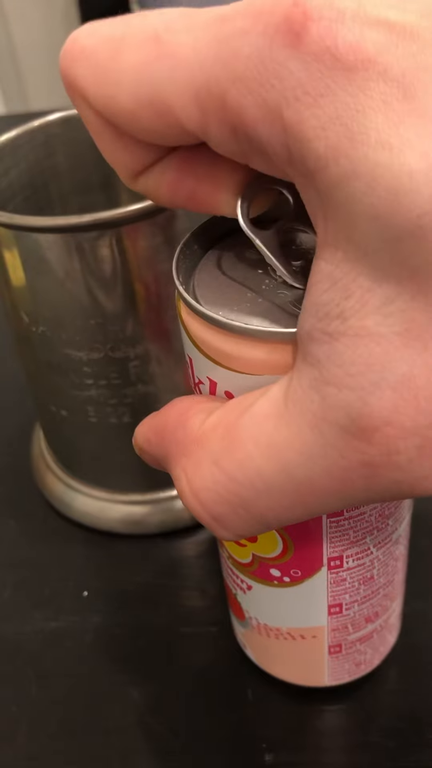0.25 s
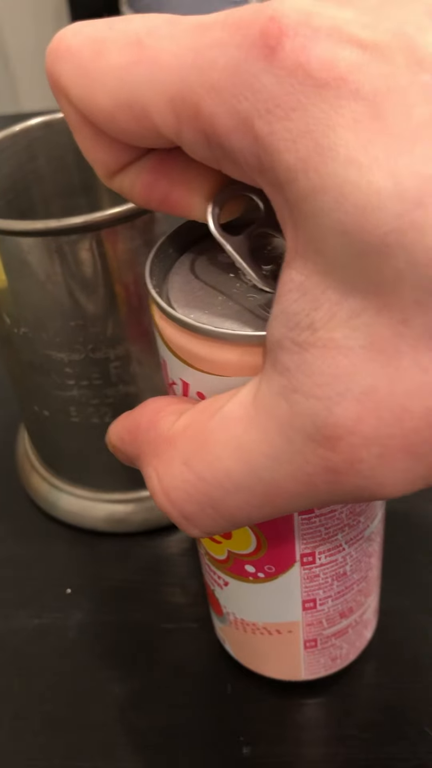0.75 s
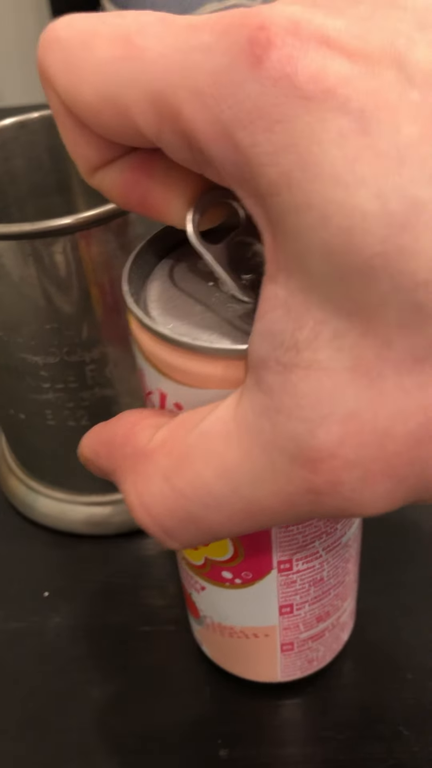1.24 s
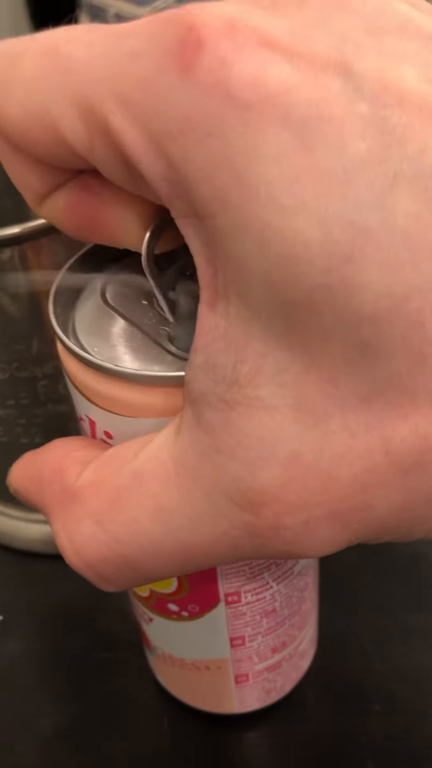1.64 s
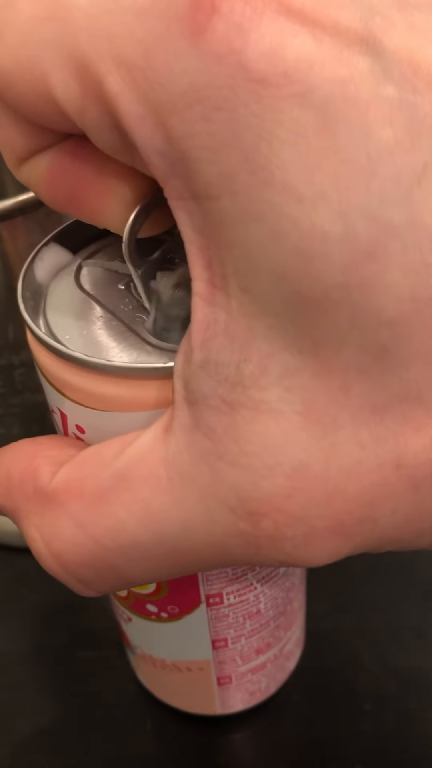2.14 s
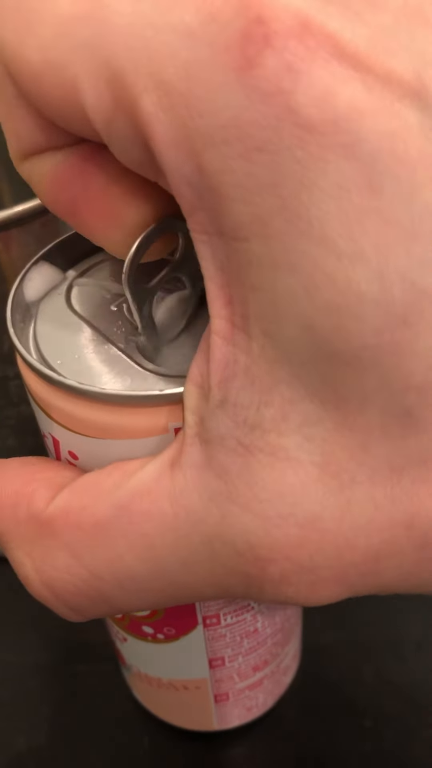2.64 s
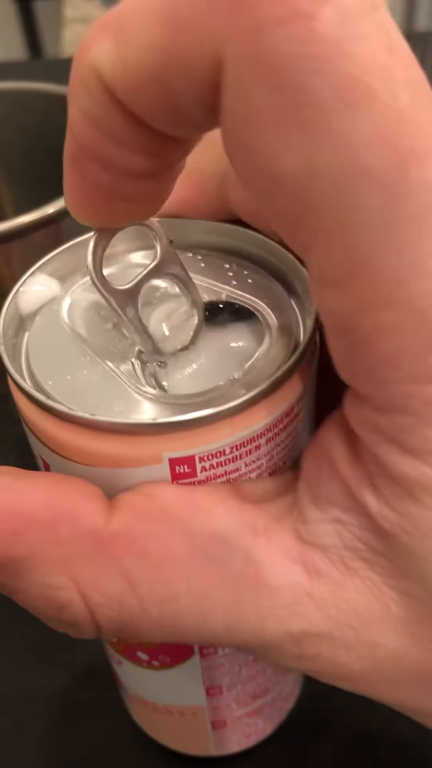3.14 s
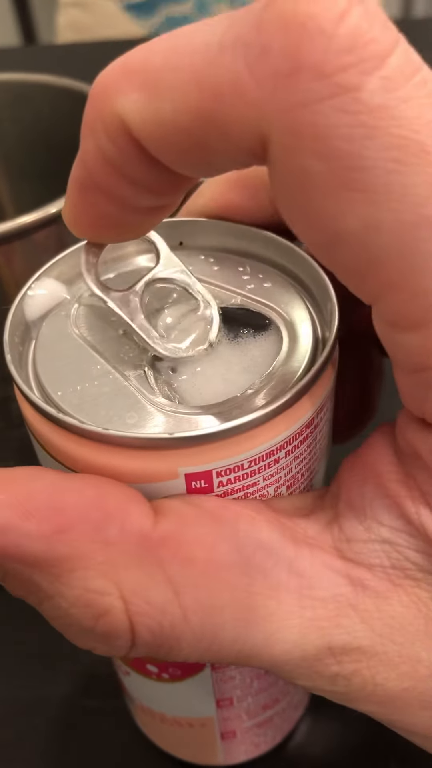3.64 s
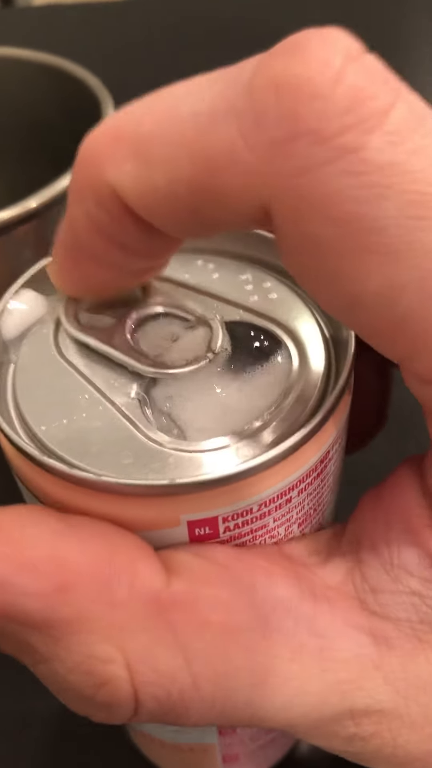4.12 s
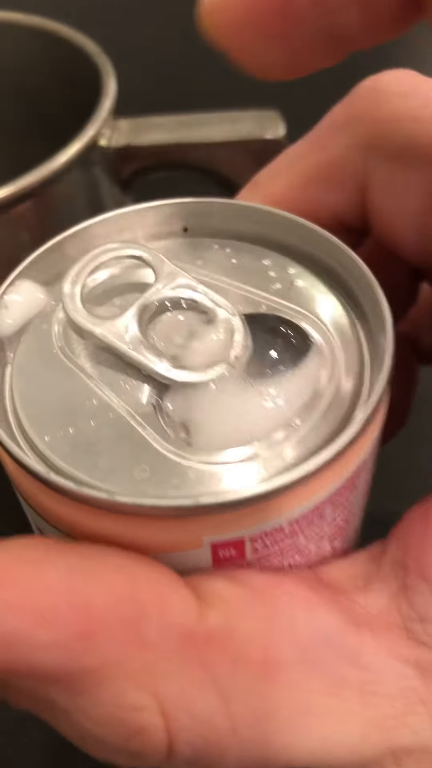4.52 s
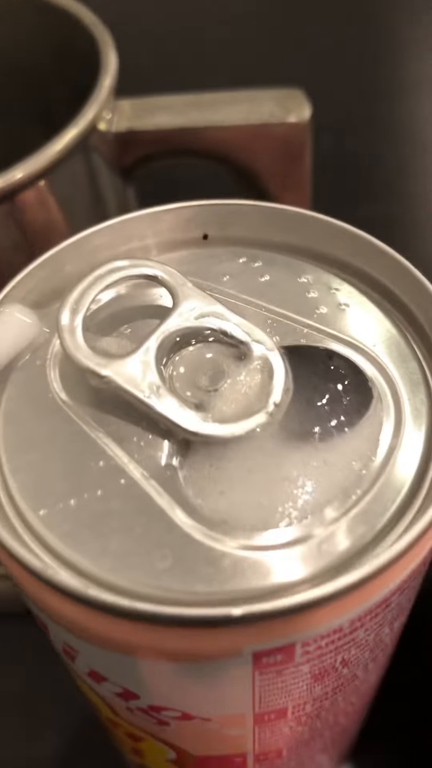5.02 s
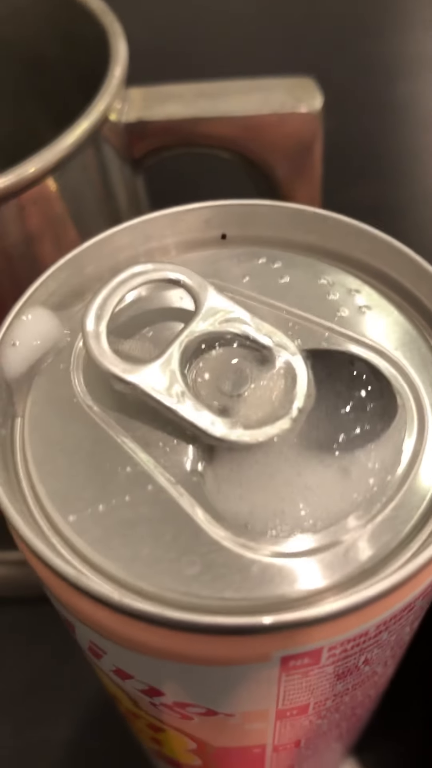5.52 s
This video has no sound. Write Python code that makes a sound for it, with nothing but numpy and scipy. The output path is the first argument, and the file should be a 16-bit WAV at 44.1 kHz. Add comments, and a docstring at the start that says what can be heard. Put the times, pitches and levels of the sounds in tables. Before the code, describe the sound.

A sealed drink can gives a sharp crack and split-second bright hiss, with more snaps just after. About one and a half seconds in, small creaks lead to a huge dry pop with a low thump. Then delicate foam crackle, faint metal ticks, a short panel plunk and soft knocks further off, over low room hum.

```python
"""A ring-pull is levered up on a full drink can in a small hard room: the scored lid cracks in steps as noise bursts
in broad resonances, gas vents as bright hiss, and the flap tears with a loud pop that turns the recorder's gain down.
Foam fizzes as random bubble rings, then the microphone moves over the hole; the folded tab and lid panel ring as sines.
Fingers rustle and a thin ring sounds as filtered noise. Further off are dull modal knocks and a grainy shuffle,
over coloured air noise and a low wavering hum."""
import sys
import numpy as np
from scipy import signal
from scipy.fft import rfft, irfft
from scipy.io import wavfile
from scipy.ndimage import uniform_filter1d, minimum_filter1d

SR = 44100
rng = np.random.default_rng(int(sys.argv[2]) if len(sys.argv) > 2 else 0)


def master(y):
    """Save y as 16-bit WAV."""
    cut = np.clip(np.atleast_2d(y).T, -1, 1)
    pcm = np.round(cut * 32767)  # scale
    wavfile.write(sys.argv[1], SR, pcm.astype(np.int16))


N = 254456
T = np.arange(N) / SR

# Lid resonances, nearly sealed and then with the flap bent; each width belongs to one of two filter passes:
# (sealed frequency [Hz], width [Hz], level [dB], bent frequency [Hz], width [Hz], level [dB])
LID_MODES = [(1270, 1100, -22.5, 1200, 700, -6), (2004, 770, -1.5, 2320, 800, -2),
             (3170, 1100, -13.5, 3350, 1200, -1.5), (4660, 1100, -2, 5100, 1500, -2),
             (6200, 1300, -5.5, 6900, 2000, 0.5), (8600, 2100, -9, 8500, 1500, -6),
             (11320, 3000, -6, 10500, 2400, -3.5), (14900, 2400, -5.5, 15000, 3500, -4)]
# Cracks and ticks of lid and tab, level before the mode gains, brightness about 5 kHz:
# (time [s], level [dB], brightness [dB/octave], resonance nearest the break [Hz], noise decay [ms], room share [dB])
CRACKS = [ (.0073, -5, -2.5, 4674, 1.04, -5.5), (0.168, -7, 4.5, 5490, 1.25, -15),
          (0.174, -19.5, 1, 4770, 1.1, -10), (.1780, -10, 2, 3153, 3, -7.5),
          (0.1841, -17.5, -0.5, 3049, 3.3, -0.5), (0.199, -21, 4, 8600, 6.2, -6),
          (1.5302, -48.5, 3, 8000, 2.4, -18.5), (1.555, -49, 2, 8058, 1.4, -12.5),
          (1.5924, -37, .3, 4885, 2.7, -8), (1.5938, -30.5, -1.5, 3296, 3.1, -3),
          (1.6034, -26, 1, 7500, 1.6, -1.5), (1.616, 2.5, 1.5, 7000, .6, -15),
          (1.6173, 10, 2, 3000, 1.8, -9.5), (2.5590, -56, -1.5, 14000, 1.86, -14.5),
          (2.8420, -59, 6, 8560, 2.15, -13), (3.9854, -56.5, -1, 10410, 0.86, -17),
          (4.055, -65, 2, 6690, 1.1, -18.5), (4.068, -65, 6, 6720, .8, -15),
          (4.0958, -48, 4, 5000, 1.17, -14), (4.2996, -57, 0, 7000, 1.25, -17),
          (4.599, -41, -4, 1670, 5.3, -6.5), (4.889, -62.5, 2, 3600, 4.9, -6),
          (4.915, -60.5, 7, 8500, 1.5, -17), (5.4350, -60.5, -2.8, 14000, 1.1, -14)]
FLAP_BENDS_S = 1
NEAREST_DB, NEAREST_OCTAVES = 6, .3  # boost of the resonance nearest the break, its reach

# Gas through the first slit
VENT_DB, VENT_HOLD_S, VENT_FALL_DB_PER_S = -19, .007, 1896
# Pressure pushes: (time [s], peak [dB], frequency [Hz], decay before the soft onset [ms])
PUFFS = [(.004, -35.5, 92.36, 16.4), (.007, -35, 627, 1.8), (.177, -37.5, 800, 3.1), (0.189, -35, 120, 20),
         (1.603, -33.5, 242.4, 6.3), (1.614, -9.5, 199, 10), (1.626, -8, 65, 13), (2.846, -58, 430, 8.2),
         (2.849, -48.5, 106, 32)]
# Lid panel popping flat: (time [s], level [dB], frequency [Hz], swell [ms], room share [dB])
DENT = (4.3008, -28, 669.5, 6.5, -30)
# Overtones of the snapping panel: (frequency [Hz], level [dB], t60 [s])
DENT_OVERTONES = [(2590, -34, .011), (2870, -36, .011), (7150, -40, 0.0075)]
# Modes of the strained tab: (frequency [Hz], relative level [dB], t60 [s])
TAB_MODES = [(3850, -1, .017), (5250, -2.5, .017)]
# The tab slipping on its rivet: (time [s], level before the mode levels [dB])
TAB_SLIPS = [(1.531, -47.5), (1.557, -49)]

# Foam, silent before the first row: (time [s], level [dB])
FOAM_LEVEL = [(2.2, -86.5), (2.5, -75.5), (2.84, -67.5), (2.95, -72.5), (3.6, -79), (4.1, -78.5),
              (4.58, -76), (4.7, -70), (5.77, -73.5)]
# Air over the drink, colouring the foam: (frequency [Hz], width [Hz], relative level [dB])
HEADSPACE = [(5767, 2600, -9.5), (8500, 1100, -0.5)]
BUBBLE_SPREAD_DB = 3  # scale of the random bubble strengths
LOOK_IN_S = (4.74, 5.1)  # the microphone moves over the hole
BUBBLE_HZ, HEADSPACE_DB = (7250, 4696), (-3.5, -17)  # loudest bubble pitch, headspace colour: (before, after)

# Fingers shifting on the can: (full level from [s], hold [s], low rasp [dB], airy hiss [dB])
RUSTLE = [(2.56, .04, -69.5, -79), (2.81, .04, -68.5, -77), (4.72, 0.12, -73, -71), (4.9, 0.045, -73, -75)]
RUSTLE_DB_PER_S = (799.5, 700.5)  # (rise, fall)
# Partials of a faint thin ring, width per filter pass: (frequency [Hz], width [Hz], level [dB])
RING_PARTIALS = [(2430, 110, -1), (3040, 134, -7)]
# Its strokes, before the partial levels: (full level from [s], hold [s], level [dB])
RING_STROKES = [(4.75, 0.069, -66), (4.95, .015, -77)]
RING_DB_PER_S = (346, 220)  # (rise, fall)

# Modes of what is knocked: (frequency [Hz], relative level [dB], t60 [s])
KNOCKED_BODY = [(226, -4, 0.095), (460, -11, 0.029), (668, -11.5, 0.061), (771, 7.3, 0.018),
                (1084, 0, 0.025), (1468, -14.5, 0.043), (2620, -24, 0.0089)]
# Dull knocks further off, brightness about 790 Hz: (time [s], level before the mode levels [dB], brightness [dB/octave])
KNOCKS = [(2.7178, -36, 0), (2.8445, -50.5, -5), (3.7515, -32, 1.3), (4.0188, -35, 1), (4.6957, -25.5, 2.5),
          (5.2870, -59.5, -2), (5.4227, -54.5, -6), (5.6601, -59, -5)]
THUD_DB = -5.5  # thud sent round the room, relative to the knock level
# Slides over a surface: (full level from [s], hold [s], level [dB])
SHUFFLE = [(4.78, 0.033, -68), (5.11, 0.055, -64.5), (5.29, .14, -62.5), (5.645, 0.019, -67)]
SHUFFLE_DB_PER_S = (300, 350)  # (rise, fall)

# Room answer, levels relative: (frequency [Hz], t60 [s], level [dB])
ROOM_BANDS = [(99, 0.23, -6.5), (235, 0.47, -0.5), (580, 0.33, 15), (1480, .5, 0.5), (2500, 0.56, -0.5),
              (4200, 0.5, 1), (7000, .45, -2), (10200, 0.35, -4.5), (13000, 0.25, -1.5), (15430, .25, -6.5)]
WALL_MS, BUILD_MS = 12, 1  # first walls answer, then the field fills up
VENT_ROOM_DB, PUFF_ROOM_DB, PING_ROOM_DB = -1.5, -7, -15.5  # shares sent round the room
# Shape of the room air noise: (frequency [Hz], relative level [dB/Hz])
AIR_SPECTRUM = [(15, -37), (25, -16), (110, -3), (157, -6), (194, -9), (461, -19), (527, -18.5),
                (1090, -25.5), (1640, -31.5), (2460, -32.5), (2660, -37), (2890, -33.5), (5230, -39),
                (6490, -36), (15800, -52.5)]
AIR_DB = -62.5
# Wavering hum, width per filter pass: (frequency [Hz], width [Hz], level [dB])
HUM = [(51.3, 6.1, -75), (105, 39, -68.5), (190, 17, -66), (251, 42, -71.5), (1010, 100, -80.5),
       (5260, 300, -88.5)]

# Recorder: ceiling, own hiss, top cut
CEILING_DB, SELF_NOISE_DB, CUTOFF_HZ = -1.2, -82, 16600
FAST_DB_PER_S, FAST_SHARE_DB = 449, 4  # quick recovery of the first few dB
HOLD_S, RECOVER_S = 0.36, 0.89  # the rest is held, then shrinks with this time constant


def from_db(db):
    """Amplitude ratio of a level in dB."""
    return 10 ** (np.asarray(db) / 20)


def rms_one(x):
    """Scale to an RMS of one."""
    return x / np.sqrt(np.mean(x ** 2) + 1e-30)


def peak_one(x):
    """Scale to a peak of one."""
    return x / np.max(np.abs(x))


def at_hz(points, hz, column=1):
    """Read a table column along a logarithmic frequency axis."""
    points = np.array(points)
    return np.interp(np.log(hz), np.log(points[:, 0]), points[:, column])


def in_time(rows):
    """A level curve in dB; practically silent before its first row."""
    return np.interp(T, *np.transpose(rows), left=-140)


def resonate(x, hz, width_hz):
    """One damped resonance: a two-pole filter with zeros at both ends of the spectrum."""
    radius = np.exp(-np.pi * width_hz / SR)
    poles = [1, -2 * radius * np.cos(2 * np.pi * hz / SR), radius * radius]
    return signal.lfilter([1 - radius, 0, radius - 1], poles, x)


def resonate_twice(x, hz, width_hz):
    """Two equal resonances in a row, for steeper skirts."""
    return resonate(resonate(x, hz, width_hz), hz, width_hz)


def band(x, low_hz, high_hz):
    """Keep the band between two frequencies."""
    sos = signal.butter(2, [low_hz, min(high_hz, .45 * SR)], "band", fs=SR, output="sos")
    return signal.sosfilt(sos, x)


def add(out, s, sound):
    """Lay a sound into the track at a time in seconds."""
    i = round(s * SR)
    out[i:i + len(sound)] += sound[:N - i]


def strokes(rows, db_per_s, column=2):
    """Gain of separate strokes: each rises ahead of its start, holds for its length and falls."""
    rise, fall = db_per_s
    gain = np.zeros(N)
    for row in rows:
        start, length, level_db = row[0], row[1], row[column]
        before, after = np.maximum(start - T, 0), np.maximum(T - start - length, 0)
        gain += from_db(level_db - rise * before - fall * after)
    return gain


def struck(modes, db):
    """Freely ringing metal: a sum of dying sines."""
    t = T[:3000]
    return sum(from_db(db + mode_db - 60 * t / t60) * np.sin(2 * np.pi * hz * t) for hz, mode_db, t60 in modes)


def cracks():
    """Tearing metal: dying noise shakes the broad lid resonances; returns direct sound and room feed."""
    out, feed, t = np.zeros(N), np.zeros(N), T[:1800]
    for s, db, tilt_db, nearest_hz, ms, room_db in CRACKS:
        tear = rng.standard_normal((len(LID_MODES), len(t))) * np.exp(-t * 1000 / max(ms, .1))
        burst, power = np.zeros(len(t)), 0
        for k, modes in enumerate(LID_MODES):
            hz, width_hz, mode_db = modes[3:] if s > FLAP_BENDS_S else modes[:3]
            near_db = NEAREST_DB * np.exp(-(np.log2(hz / nearest_hz) / NEAREST_OCTAVES) ** 2)
            gain = from_db(db + mode_db + near_db + tilt_db * np.log2(hz / 5000))
            part = gain * peak_one(resonate_twice(tear[k], hz, width_hz))
            burst += part
            power += gain ** 2
            # summed over all directions the burst has the same energy but an even spectrum
            even = rms_one(resonate_twice(t == 0, hz, width_hz))
            add(feed, s, (-1) ** k * from_db(room_db) * np.std(part) * even)
        add(out, s, np.sqrt(power) * peak_one(burst))
    return out, feed


def vent():
    """Gas under pressure hisses brightly through the slit, as wideband noise that soon dies."""
    level_db = VENT_DB - VENT_FALL_DB_PER_S * np.maximum(T - VENT_HOLD_S, 0)
    return from_db(level_db) * rms_one(band(rng.standard_normal(N), 2200, 17000))


def puffs():
    """Released pressure thumps low and lumpy: a sine and band noise under one soft, dying envelope."""
    out, t = np.zeros(N), T[:12000]
    for s, db, hz, ms in PUFFS:
        lumps = rms_one(band(rng.standard_normal(len(t)), hz * 0.12, hz * 3.8))
        push = np.sin(2 * np.pi * hz * t) + 0.78 * lumps
        envelope = (1 - np.exp(-t / .006)) * np.exp(-t * 1000 / ms)
        add(out, s, from_db(db) * peak_one(push * envelope))
    return out


def dent():
    """The panel swings up over a few cycles and is stopped by the finger, leaving a weak dying tail."""
    s, db, hz, ms = DENT[:4]
    out, t = np.zeros(N), T[:3000]
    swell = np.sin(np.pi * np.minimum(t * 1000 / ms, 1)) ** 2
    tail = from_db(-10.5 - 60 * t / 0.074)
    add(out, s, from_db(db) * (swell + tail) * np.sin(2 * np.pi * hz * t))
    return out


def pings():
    """Each slip sets the tab ringing thinly; the panel's overtones flash as it pops."""
    out = np.zeros(N)
    for s, db in TAB_SLIPS:
        add(out, s, struck(TAB_MODES, db))
    add(out, DENT[0], struck(DENT_OVERTONES, 0))
    return out


def foam():
    """Tiny bubbles burst at random, a few much louder, each ringing some three cycles."""
    strength_db = BUBBLE_SPREAD_DB * (np.minimum(rng.exponential(1, N), 4.8) - 3.0)
    pulses = from_db(strength_db) * rng.choice([-1, 1], N)
    bursting = rng.random(N) < 1200 / SR  # about 1200 a second
    born = pulses * bursting + 0.077 * rng.standard_normal(N)
    pitch_class, loudest_hz = rng.integers(0, 12, N), np.interp(T, LOOK_IN_S, BUBBLE_HZ)
    rings = np.zeros(N)
    for k, hz in enumerate(np.geomspace(2200, 14500, 12)):
        weight = from_db(-6.0 * np.log2(hz / loudest_hz) ** 2)
        rings += weight * resonate(born * (pitch_class == k), hz, hz / 3.1)
    hollow = sum(from_db(db) * resonate(rings, hz, width_hz) for hz, width_hz, db in HEADSPACE)
    colour = from_db(np.interp(T, LOOK_IN_S, HEADSPACE_DB))
    # the hollow part is fed by rings 1.5 times weaker than the direct ones
    fizz = 1.5 * rings + colour * 1.5 * hollow / 1.5
    return from_db(in_time(FOAM_LEVEL)) * rms_one(fizz)


def rustle():
    """Skin rubs softly on metal: a low rasp and an airy hiss of noise."""
    rasp = rms_one(band(rng.standard_normal(N), 1800, 4450))
    airy = rms_one(band(rng.standard_normal(N), 5000, 15800))
    rasp_gain = strokes(RUSTLE, RUSTLE_DB_PER_S)
    airy_gain = strokes(RUSTLE, RUSTLE_DB_PER_S, column=3)
    return rasp_gain * rasp + airy_gain * airy


def thin_ring():
    """A faint ring made of noise in two narrow resonances."""
    partials = [from_db(db) * rms_one(resonate_twice(rng.standard_normal(N), hz, width_hz))
                for hz, width_hz, db in RING_PARTIALS]
    return strokes(RING_STROKES, RING_DB_PER_S) * sum(partials)


def knocks():
    """A soft contact starts every mode of the body at once; a broad thud goes round the room."""
    out, feed, t = np.zeros(N), np.zeros(N), T[:8000]
    thud = peak_one(band(band(t == 0, 147, 1560), 130, 2140))
    for s, db, tilt_db in KNOCKS:
        for hz, mode_db, t60 in KNOCKED_BODY:
            level_db = db + mode_db + tilt_db * np.log2(hz / 790)
            soft_start = 1 - np.exp(-t * hz * 0.71)
            add(out, s, from_db(level_db - 60 * t / t60) * soft_start * np.sin(2 * np.pi * hz * t))
        add(feed, s, from_db(db + THUD_DB) * thud)
    return out, feed


def shuffle():
    """Something slides over a surface: uneven dull grains of noise."""
    unevenness_db = 4.3 * rms_one(band(rng.standard_normal(N), 9.3, 115))
    grains = rng.standard_normal(N) * from_db(unevenness_db)
    return strokes(SHUFFLE, SHUFFLE_DB_PER_S) * rms_one(band(grains, 310, 1160))


def room(x, wall_ms, build_ms):
    """Dense echoes: noise that builds up after the first wall and dies band by band; energy 1."""
    t, edges = T[:SR], 70 * 2 ** np.arange(0, 7.9, .25)
    tail = np.zeros(SR)
    for low in edges[:-1]:
        hz = low * 2 ** (1 / 8)
        level_db = at_hz(ROOM_BANDS, hz, column=2) - 60 * t / at_hz(ROOM_BANDS, hz)
        tail += band(rng.standard_normal(SR), low, low * 2 ** (1 / 4)) * from_db(level_db)
    tail *= 1 - np.exp(-np.maximum(t * 1000 - wall_ms, 0) / build_ms)
    return signal.fftconvolve(x, tail / np.sqrt(np.sum(tail ** 2)))[:N]


def room_tone():
    """Steady coloured air noise with a few narrow wavering hums, each resonated from noise."""
    hz = np.maximum(np.fft.rfftfreq(N, 1 / SR), 1)
    spectrum = rfft(rng.standard_normal(N)) * from_db(at_hz(AIR_SPECTRUM, hz))
    air = from_db(AIR_DB) * rms_one(irfft(spectrum, N))
    hums = [from_db(db) * rms_one(resonate_twice(rng.standard_normal(N), hum_hz, width_hz))
            for hum_hz, width_hz, db in HUM]
    return air + sum(hums)


def scene():
    """The can close to the microphone, its room answer, the sounds further off and the room tone."""
    lid, lid_feed = cracks()
    gas, push, pop, thin = vent(), puffs(), dent(), pings()
    far, thuds = knocks()
    feed = lid_feed + from_db(VENT_ROOM_DB) * gas + from_db(PUFF_ROOM_DB) * push
    feed += from_db(DENT[4]) * pop + from_db(PING_ROOM_DB) * thin
    wet = room(feed, WALL_MS, BUILD_MS) + room(thuds, 0.63, 0.78)
    can = lid + gas + push + pop + thin + foam() + rustle() + thin_ring()
    return (can + far + shuffle() + wet + room_tone())[None]


def released(level, fall_per_s):
    """Jumps up with the demand, sinks at a set pace."""
    return np.maximum.accumulate(level + fall_per_s * T) - fall_per_s * T


def record(dry):
    """A limiter ducks just ahead of an overload, gives a little back at once, holds the rest and creeps up; hiss, top cut."""
    over_db = np.maximum(20 * np.log10(np.abs(dry[0]) + 1e-9) - CEILING_DB, 0)
    # a straight fall of the logarithm makes the cut in dB shrink exponentially
    slow_db = np.exp(released(np.log(np.maximum(over_db - FAST_SHARE_DB, 1e-6)), 1 / RECOVER_S))
    hold = round(HOLD_S * SR)
    # largest cut within the hold time
    held_db = -minimum_filter1d(np.pad(-slow_db, (hold, 0)), hold + 1, origin=hold // 2)[hold:]
    duck_db = np.maximum(held_db, released(over_db, FAST_DB_PER_S))
    ahead_db = uniform_filter1d(np.pad(duck_db[30:], (0, 30), "edge"), size=40)
    ceiling = from_db(CEILING_DB)
    limited = np.clip(dry * from_db(-ahead_db), -ceiling, ceiling)
    hiss = from_db(SELF_NOISE_DB) * band(rng.standard_normal(dry.shape), 60, 15500)
    top_cut = signal.cheby2(12, 50, CUTOFF_HZ, fs=SR, output="sos")
    return signal.sosfilt(top_cut, limited + hiss)


dry = scene()
out = record(dry)
master(out)
```